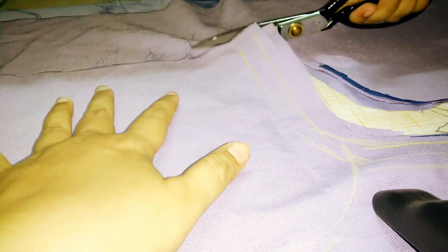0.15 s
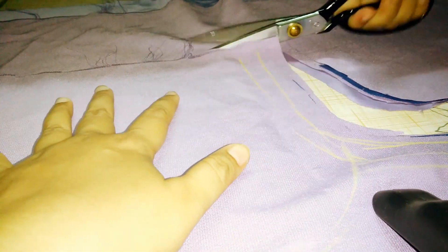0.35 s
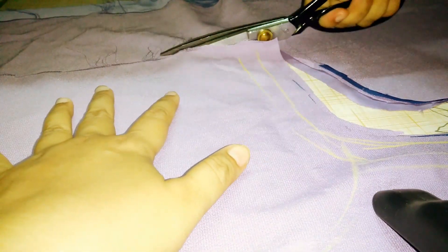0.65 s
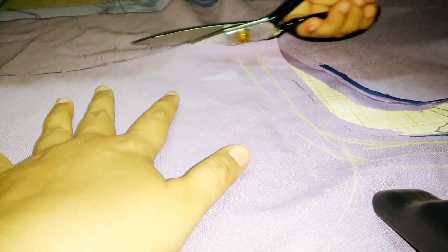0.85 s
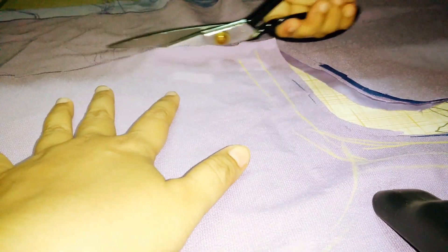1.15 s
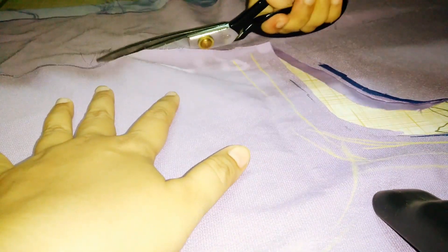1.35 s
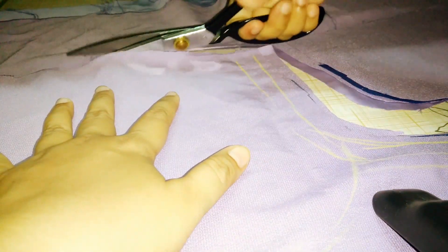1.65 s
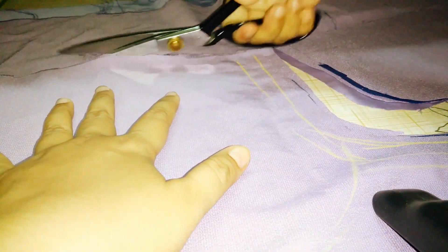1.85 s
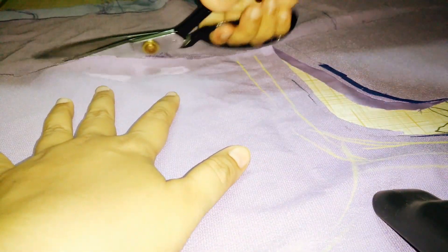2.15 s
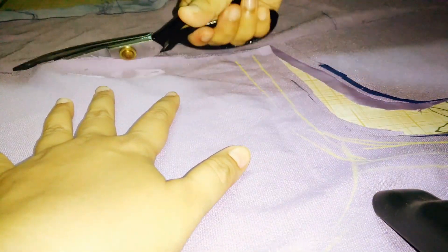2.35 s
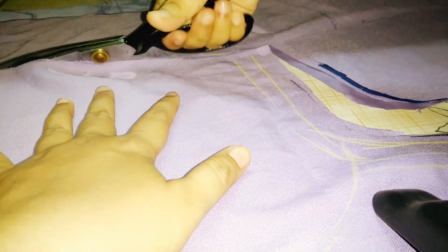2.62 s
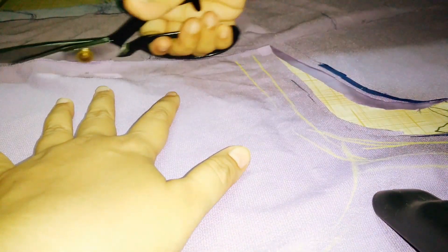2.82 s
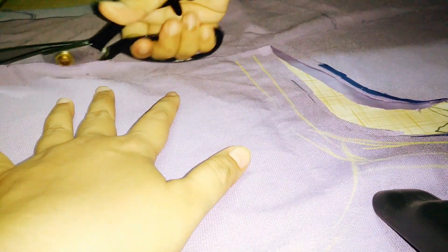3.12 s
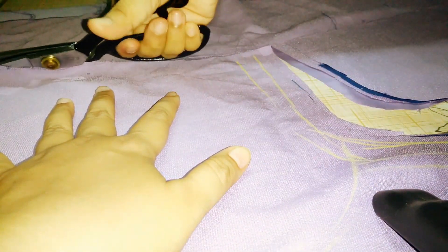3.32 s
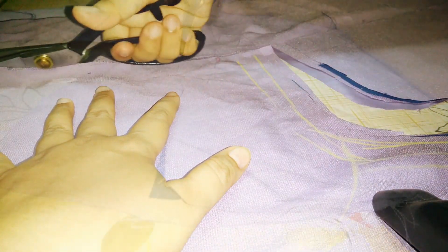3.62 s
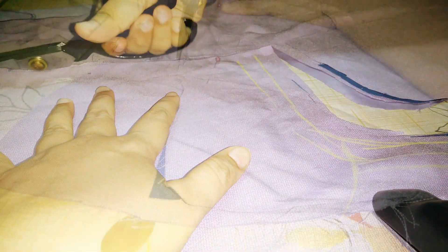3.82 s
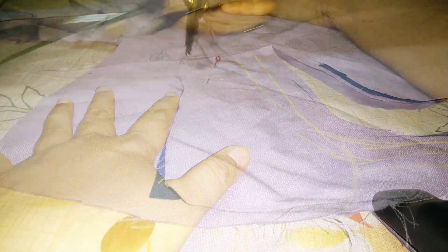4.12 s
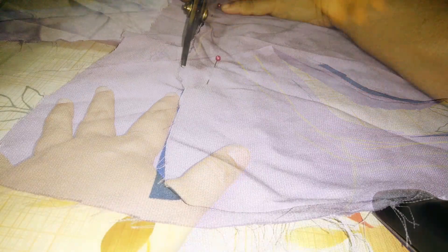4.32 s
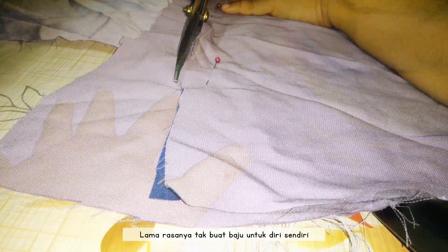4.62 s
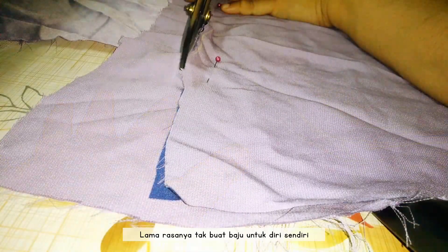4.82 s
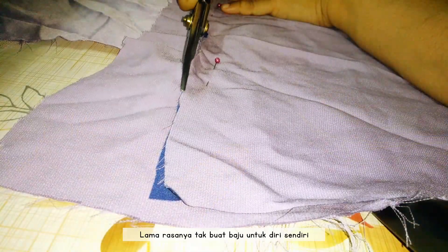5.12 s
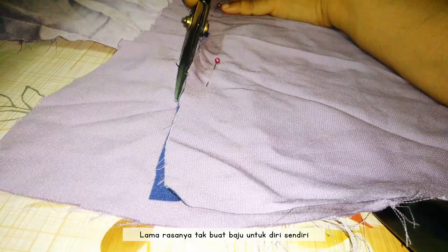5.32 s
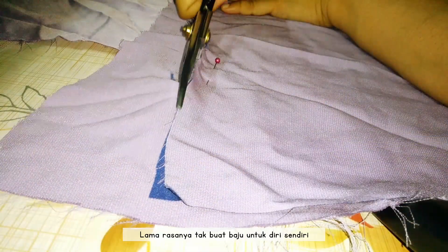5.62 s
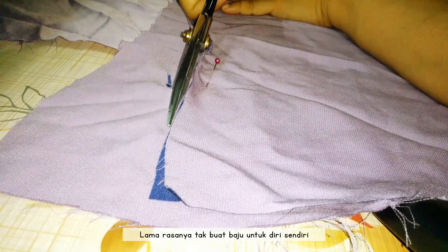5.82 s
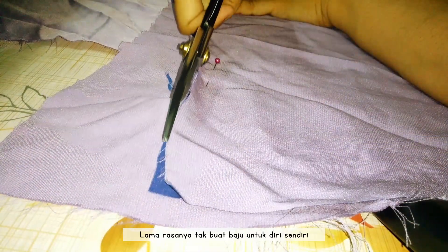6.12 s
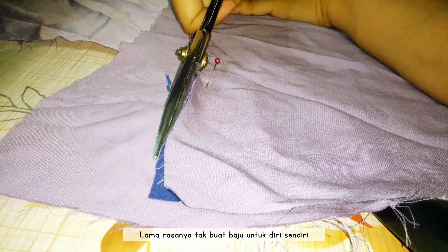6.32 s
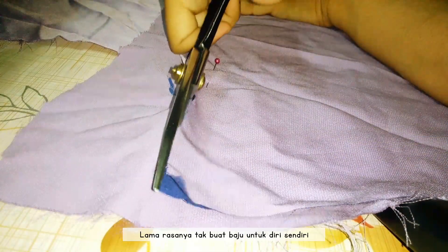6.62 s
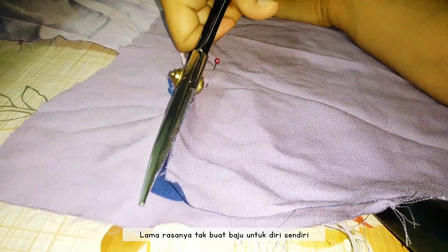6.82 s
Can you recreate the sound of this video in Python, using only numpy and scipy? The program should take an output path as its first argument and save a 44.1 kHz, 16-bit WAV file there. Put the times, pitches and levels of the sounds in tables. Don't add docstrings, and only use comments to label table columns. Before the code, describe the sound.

Close, dry scissor cuts crackle through fabric with short scrapes between, first heavy, then quick and brighter, finally slow and firm over a quiet room.

```python
import sys
import numpy as np
from scipy import signal
from scipy.fft import rfft, irfft
from scipy.io import wavfile
from scipy.ndimage import uniform_filter1d

SR = 44100
rng = np.random.default_rng(int(sys.argv[2]) if len(sys.argv) > 2 else 0)


def volts_from_db(level):
    exponent = np.asarray(level, float) / 20
    return 10 ** exponent


def transcribe(u):
    v = np.clip(np.atleast_2d(u).T, -1, 1)
    q = np.round(v * 32767).astype(np.int16)
    wavfile.write(sys.argv[1], SR, q)


N = 306495
T = np.arange(N) / SR

# start_s, length_s, force_db, handles_db, steel_db
FOLD_CUTS = [
    (0.002, .05, -48, -3, -3.5),
    (0.34, .15, -44, -9, -5.5),
    (0.795, 0.094, -41, -13, -7),
    (1.148, 0.093, -43, -9, -3),
]
# start_s, length_s, force_db, handles_db, steel_db
QUICK_CUTS = [
    (1.505, 0.11, -44.5, -0.5, -2),
    (1.858, .11, -45, 2.5, 3.5),
    (2.186, 0.1, -45.5, -0.5, 0),
    (2.482, 0.094, -45, 1.5, 2),
    (2.77, 0.12, -46, 0, 2),
    (3.134, 0.1, -47, -3.5, 2),
    (3.487, 0.17, -48.5, 1, 3),
    (4.0, 0.063, -41, 1.5, 2.5),
]
# start_s, length_s, force_db, handles_db, steel_db
SLOW_CUTS = [
    (4.594, 0.26, -50.5, 1.5, 2),
    (5.276, 0.25, -47, -2.5, 0.5),
    (5.908, 0.14, -48.5, -1, 1),
    (6.405, 0.15, -48.5, -1.5, -1),
    (6.869, 0.15, -53.5, 3, 2.5),
]
# start_s, length_s, force_db, handles_db, steel_db
OPENINGS = [(0.527, 0.062, -48, -7.5, 0), (0.94, 0.057, -47.5, -7.5, -2), (1.291, 0.05, -44.5, -7, -4.5),
            (1.68, .048, -48, -4, -2), (2.027, 0.051, -51.5, 7.5, 5), (2.348, 0.049, -50.5, 8, 5),
            (2.642, 0.043, -50, 6, 3), (2.937, 0.05, -50.5, 1.5, 2), (3.297, 0.037, -49.5, -1, 0),
            (3.448, 0.043, -47, 0, -2.5), (3.66, 0.027, -48.5, 4, -0.5), (3.7, 0.072, -48.5, 0.5, 2.5),
            (3.79, 0.18, -53.5, 6, 8), (3.966, 0.037, -48, 3, 6.5), (4.07, 0.024, -56, 0, 7.5),
            (4.163, 0.057, -44.5, -0.5, 3), (4.933, 0.044, -47, 0.5, -1.5), (5.2, 0.023, -51.5, -0.5, -4.5),
            (5.601, 0.047, -44.5, -1.5, -5), (5.855, 0.037, -47, -11, -14), (6.112, 0.064, -49.5, 0, -2.5),
            (6.358, 0.043, -47, -4.5, 0.5), (6.617, 0.035, -46.5, -2.5, -6)]
# travel_share, table_db, handles_db, blades_db, edge_hiss_db
FOLD_SHAPE = [(0, 1, -3.5, -7.5, -1), (.35, 1, 1.5, -10.5, 2), (.6, 0, 2, -9, 2), (.85, -2, -6, -5, 3),
              (1, -8, -8, -9, -7.5)]
QUICK_SHAPE = [(0, -2.5, -4, -15.5, 2), (.25, -0.5, 0, -10.5, 1), (.55, 3.5, 3, -11.5, 1),
               (.85, -4.5, -1.5, -6, 5), (1, -4, -5.5, -13.5, -9)]
SLOW_SHAPE = [(0, 0.5, 0.5, -3.5, -5.5), (.3, -1.5, -0.5, -4.5, -0.5), (0.551, 0.5, -1.5, -9, -2.5),
              (.75, 4, 2.5, -0.5, 6), (.88, 7.5, 7, 2.5, 8.5), (1, 0.5, -3, -8, -1.5)]
OPENING_SHAPE = [(0, 4, -2.5, -16.5, -7), (.3, -2, -2.5, -10, -3), (1, -6, -5, -16, -14.5)]
# bite_s, lead_s, level_db
CREEPS = [
    (0.796, 0.021, -52.5),
    (1.148, 0.022, -52.5),
    (1.505, 0.038, -52.5),
    (3.134, 0.016, -58.5),
    (4.6, 0.066, -53.5),
    (5.279, 0.024, -62),
]
# time_s, depth_db, length_ms
STICKS = [(1.584, 3, 4.5), (1.876, 14, 9.7), (2.062, 14, 7.5), (2.261, 4, 3.3), (2.782, 10, 11),
          (2.845, 2, 6.6), (3.467, 19, 17.4), (3.495, 11, 7.1), (3.623, 5, 12), (3.658, 6, 9.8),
          (3.69, 10, 12), (3.811, 11, 12), (3.846, 21, 13.4), (3.885, 17, 13.5), (3.906, 15, 8.5),
          (3.928, 16, 9.8), (3.947, 6, 14), (4.034, 2, 6.3), (4.592, 41, 7.8), (4.72, 11, 6.5),
          (4.779, 8, 8.7), (4.822, 10, 6.3), (5.506, 6.5, 15), (6.371, 17, 7.9), (6.383, 2, 4.6),
          (6.424, 8, 20), (6.918, 10, 13)]
# low_hz, high_hz, broad_crackle_db (re rings), threads_per_s, scatter_db, flutter_db,
# darkening_db_per_octave (towards the tips), later_crackle_db (change in second sitting)
PARTS = [
    (141, 600, -17.5, 1200, 2.5, 2.5, -4.5, 0.5),
    (590, 1590, -24.5, 2200, 2, 2.5, 7.5, 3.5),
    (1960, 5500, -8, 5000, 1.5, 2.5, 27.5, -5),
    (4450, 11650, -16.5, 13000, 2.66, 3.5, 34, -2),
]
# mode_hz, width_hz, level_db
FIRST_MODES = [(242, 99, -6), (431, 223, -1), (871, 110, 10.5), (623, 47, -5.5), (1285, 111, 13),
               (1760, 20, -23), (2000, 130, -2), (2790, 56, 0), (3628, 720, 5), (4340, 22, -2.5),
               (5670, 154, 3), (6083, 153, 10.5), (6885, 615, 6), (7560, 400, -4.5), (6940, 620, -30.5),
               (9200, 50, -38)]
# mode_hz, width_hz, level_db
SECOND_MODES = [(221.3, 38, -3.5), (393, 173, -2.5), (926, 260, 6.5), (740, 74, 1.5), (1266, 236, 8),
                (1479, 213, 0.5), (2770, 100, -7), (3200, 190, 3.5), (3652, 190, 2), (5620, 1300, -13.5),
                (6120, 92, 3), (6544, 240, 1), (7355, 460, -10), (7500, 87, -33)]
# time_s, peak_db, ring_hz, tick_db
KNOCKS = [(0.349, -25, 242, 4.5), (0.469, -30, 248, 8), (0.792, -41, 245, 10), (1.149, -28, 431, 5),
          (1.291, -35.5, 496, -9), (1.513, -31, 344, 13.5), (1.565, -29, 490, -15.5),
          (1.678, -37.5, 366, -1), (1.859, -30.5, 353, 2), (2.023, -40, 474, -10), (2.211, -31.5, 368, 5),
          (2.345, -36.5, 436, 5), (2.483, -33, 393, -2), (2.641, -36, 434, -1), (2.77, -35, 424, 8),
          (3.45, -35.5, 394, 4), (3.599, -29, 508, 8), (4.008, -20.5, 940, -29), (4.039, -22, 518, -9),
          (5.199, -33, 388, -1), (5.279, -35.5, 836, 4), (5.601, -33, 332, -2), (5.483, -25.5, 500, -12.5),
          (5.857, -31.5, 326, 2), (5.898, -37.5, 396, 7), (6.029, -29.5, 560, 6), (6.147, -34, 396, 5),
          (6.356, -32, 317, 8), (6.375, -33, 393, 8), (6.539, -28.5, 726, -12)]
# start_s, end_s
OVERLAP_S = (3.47, 4.95)
# time_s, pull_db
PULL = [(0, -4.5), (.3, 1.5), (.7, 4.5), (1.1, 2), (1.4, -2), (2.1, -0.5), (3.05, -2.5), (3.4, 0.5),
        (4.26, 0), (4.5, 0), (4.9, 2), (5.1, -4), (5.8, -0.5), (6.2, -1.5), (6.34, 4.5), (6.6, -2),
        (6.8, -3)]
# freq_hz, density_db
CLOTH_SPECTRUM = [(900, -29.5), (1600, -0.5), (2200, -3.5), (2800, -3.5), (3500, -3), (4200, -2), (4800, 2),
                  (5400, -3.5), (7000, -1), (7800, -10.5), (8600, -26)]
# freq_hz, density_db
HUM_SPECTRUM = [(15, -44.5), (25, -2.5), (43, -5), (101, 3.5), (156, -6), (220, 1.5), (406, 0), (1050, -14),
                (1280, -11), (1890, -37), (5550, -26), (6920, -16.5), (8620, -32.5), (11200, -84.5),
                (19000, -120)]


def unit(x):
    return x / np.sqrt(np.mean(x ** 2))


def ring(x, hz, width_hz):
    return signal.lfilter(*signal.iirpeak(hz, hz / width_hz, fs=SR), x)


def band(x, lo_hz, hi_hz, order=2):
    return signal.sosfilt(signal.butter(order, [lo_hz, hi_hz], "band", fs=SR, output="sos"), x)


def smooth(x, length):
    return uniform_filter1d(uniform_filter1d(x, length), length)


def walk(rate_hz):
    hold = int(SR / rate_hz)
    steps = np.repeat(rng.standard_normal(N // hold + 1), hold)
    return unit(smooth(steps, hold)[:N])


def coloured(x, spectrum):
    hz, db = np.transpose(spectrum)
    freq_hz = np.fft.rfftfreq(N, 1 / SR) + 1
    gain_db = np.interp(np.log(freq_hz), np.log(hz), db, left=-60, right=-90)
    return unit(irfft(rfft(x) * volts_from_db(gain_db), N))


def threads(rate_hz, scatter_db):
    when, sign, size = rng.random((3, N))
    return (when < rate_hz / SR) * np.sign(sign - 0.5) * volts_from_db(-scatter_db * np.log(size + 1e-9))


def loading():
    strokes = []
    for cuts, shape in ((FOLD_CUTS, FOLD_SHAPE), (QUICK_CUTS, QUICK_SHAPE),
                        (SLOW_CUTS, SLOW_SHAPE), (OPENINGS, OPENING_SHAPE)):
        share, *part_db = np.transpose(shape)
        for start_s, length_s, force_db, handles_db, steel_db in cuts:
            offset_db = np.array([[0], [handles_db], [steel_db], [steel_db]])
            load_db = np.array(part_db) + force_db + offset_db
            strokes.append(np.transpose([start_s + np.clip(share, 0, 1) * length_s, *load_db]))
    for bite_s, lead_s, db in CREEPS:
        strokes.append(np.array([[bite_s - lead_s, db - 10, db - 15, db - 21, db - 23],
                                 [bite_s - 0.004, db, db - 1, db - 3, db - 1]]))
    strokes.sort(key=lambda stroke: stroke[0, 0])
    rows = np.concatenate(strokes)
    rows[:, 0] = np.minimum.accumulate(rows[::-1, 0])[::-1]
    last = np.cumsum([len(stroke) for stroke in strokes]) - 1
    spans = [(rows[i - len(stroke) + 1, 0], rows[i, 0]) for i, stroke in zip(last, strokes)]
    return rows.T, spans


def contact(spans):
    starts, ends = np.transpose(spans)
    k = np.searchsorted(ends, T)
    until_s = np.append(starts, 99)[k] - T
    since_s = T - np.append(-99, ends)[k]
    return np.maximum(np.exp(-np.maximum(until_s + 0.0019, 0) / 0.003), np.exp(-since_s / 0.0037))


def binding():
    dip_db = np.zeros(N)
    for s, db, ms in STICKS:
        dip_db += np.interp(T, [s - ms * 0.00092, s, s + ms * 0.00097], [0, -db, 0])
    for s, *_ in KNOCKS:
        dip_db += np.interp(T, [s - 0.004, s + 0.0057, s + 0.0081], [0, -7, 0])
    return dip_db


def shears():
    (time_s, *part_loads_db), spans = loading()
    travel = np.interp(T, np.ravel(spans), np.tile([-0.5, 0.5], len(spans)))
    second = np.interp(T, [3.7, 4.3], [0, 1])
    fold_db = np.interp(T, [1.0, 1.3, 3.7, 4.3], [5.5, -2.5, -4, 1.5])
    patchy = walk(25)
    patchy_db = 5.0 - 2.37 * second
    judder = np.tanh(walk(76))
    out = np.zeros(N)
    for part_row, load_db in zip(PARTS, part_loads_db):
        lo, hi, broad_db, threads_hz, scatter_db, flutter_db, slide_db, later_db = part_row
        flutter = 0.36 * judder + 0.75 * walk(140)
        crackle = threads(threads_hz, scatter_db) * volts_from_db(flutter_db * flutter)
        part = volts_from_db(broad_db + fold_db + later_db * second) * unit(band(crackle, lo, hi, order=4))
        for share, modes in ((1 - second, FIRST_MODES), (second, SECOND_MODES)):
            rings = np.zeros(N)
            for k, (hz, width_hz, db) in enumerate(modes):
                if lo <= hz < hi:
                    drive_db = db + patchy_db * np.roll(patchy, int(hz * 31))
                    drive_db = drive_db - slide_db * travel * np.log2(hz / np.sqrt(lo * hi))
                    mode = ring(ring(crackle, hz, width_hz), hz, 4 * width_hz)
                    rings += (-1) ** k * volts_from_db(drive_db) * mode
            part = part + share * unit(rings)
        part = part / (smooth(part ** 2, 1100) + 1e-9) ** 0.23
        out += unit(part) * volts_from_db(np.interp(T, time_s, load_db))
    out = out - 0.5 * ring(out, 1074, 68)
    flex_db = np.interp(T, time_s, part_loads_db[0]) - 14 - 6.3 * second
    flex = unit(band(threads(330, 2.0), 55, 129)) * volts_from_db(flex_db)
    return (out * volts_from_db(binding()) + flex) * contact(spans)


def knocks():
    out = np.zeros(N + 4096)
    t = np.arange(4096) / SR
    rise = 1 - np.exp(-t / 0.002)
    for s, db, hz, tick_db in KNOCKS:
        body = np.sin(2 * np.pi * hz * t) * np.exp(-t / 0.0026)
        body += 0.5 * np.sin(2 * np.pi * 1.504 * hz * t) * np.exp(-t / 0.0021)
        noise = rng.standard_normal(4096)
        tick = volts_from_db(tick_db - 18) * band(noise, 900, 3500) * np.exp(-t / 0.0029)
        thump = 0.053 * (s < OVERLAP_S[1]) * np.sin(2 * np.pi * 88 * t) * np.exp(-t / 0.014)
        i = int((s + 0.00182) * SR)
        out[i:i + 4096] += volts_from_db(db + 7.5) * rise * (body + tick + thump)
    return band(out[:N], 65, 9000)


def cloth_swish():
    level_db = np.interp(T, [5.68, 5.84, 5.9, 6.18, 6.36, 6.45], [-81, -70, -65, -78, -64, -62],
                         left=-120, right=-120)
    return unit(ring(threads(15000, 1.0), 2000, 900)) * volts_from_db(level_db)


def cloth_drag(pull_db):
    return coloured(threads(14000, 0.96), CLOTH_SPECTRUM) * volts_from_db(-71.5 + pull_db + walk(24))


def room_hum(pull_db):
    after_cut_db, recovery_s = -4, 0.15
    level_db = -65.5 + 0.4 * pull_db + 2.5 * walk(12)
    level_db += np.interp(T, [4.4, 4.9], [0, -2])
    for s, length_s, *_ in SLOW_CUTS[:3]:
        end_s = s + length_s
        level_db += np.interp(T, [end_s - 0.05, end_s + 0.029, end_s + 0.04 + recovery_s],
                              [0, after_cut_db, 0])
    hum = coloured(rng.standard_normal(N), HUM_SPECTRUM) * volts_from_db(level_db)
    rumble = signal.sosfiltfilt(signal.butter(2, 130, fs=SR, output="sos"), hum)
    rumble_left = 0.45
    return hum - np.interp(T, OVERLAP_S, [0, 1 - rumble_left]) * rumble


def scene():
    near = shears() + knocks()
    t = np.arange(8192) / SR
    decay_s = 0.11
    walls = rng.standard_normal(8192) * np.exp(-np.log(1000) * t / decay_s) * (t > 0.003)
    tail = volts_from_db(-39.5) * signal.fftconvolve(near, walls)[:N]
    pull_db = np.interp(T, *np.transpose(PULL))
    return (near + tail + cloth_swish() + cloth_drag(pull_db) + room_hum(pull_db))[None]


def top_cut(x):
    return signal.sosfilt(signal.butter(12, 15740, fs=SR, output="sos"), x)


def record(dry):
    narrow = signal.sosfilt(signal.cheby2(14, 50, 9050, fs=SR, output="sos"), dry)
    both = (T > OVERLAP_S[0]) & (T < OVERLAP_S[1])
    hiss = rng.standard_normal(N) * volts_from_db(-84 + 3 * both)
    treble_power = uniform_filter1d(band(dry[0], 4900, 8000) ** 2, 1024)
    treble_db = 10 * np.log10(treble_power + 1e-12)
    ducked = np.clip((treble_db + 45) / 2, 0, 1)
    freq_hz = np.fft.rfftfreq(N, 1 / SR)
    hiss_slice = irfft(rfft(hiss) * (freq_hz > 8900) * (freq_hz < 10400), N)
    return top_cut(narrow + hiss - ducked * hiss_slice)


dry = scene()
out = record(dry)
transcribe(out)
```